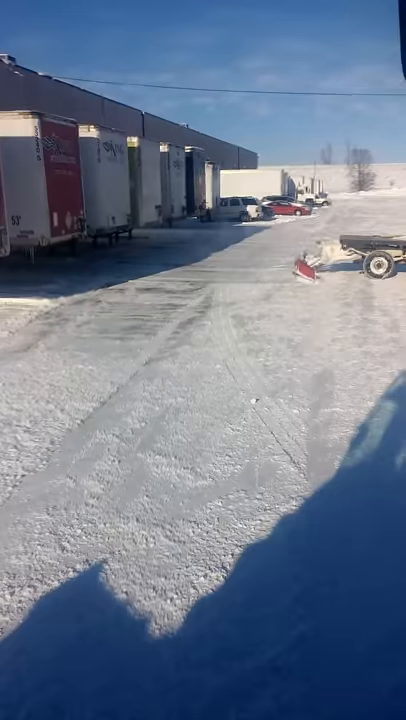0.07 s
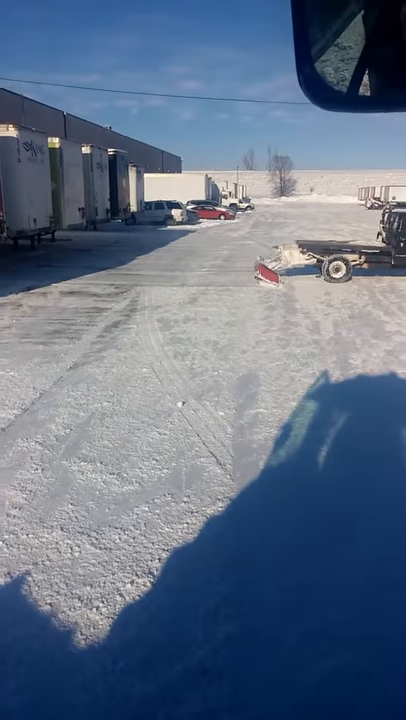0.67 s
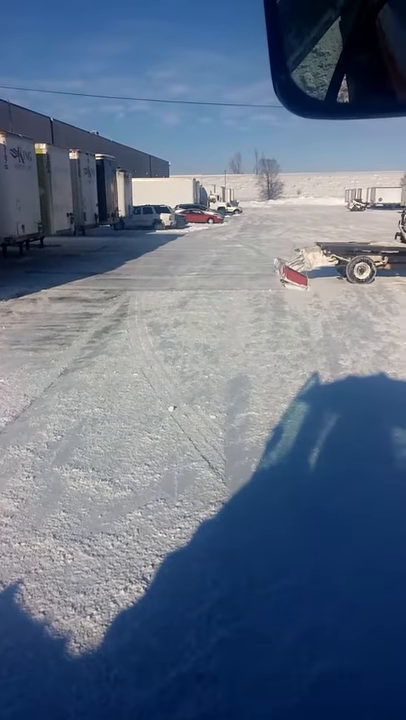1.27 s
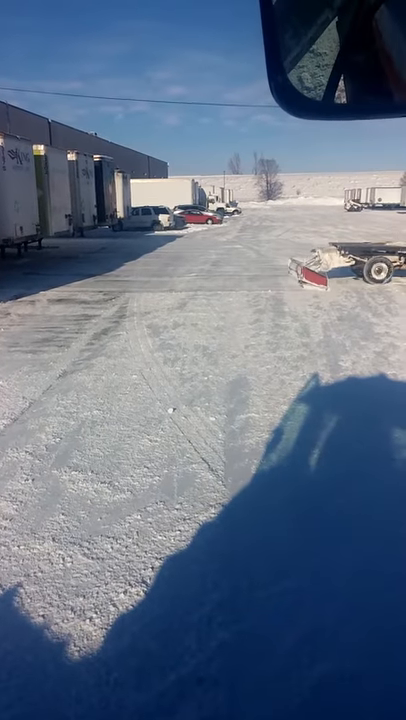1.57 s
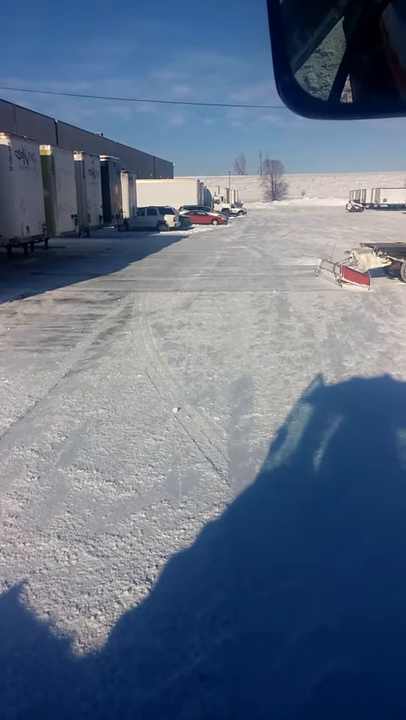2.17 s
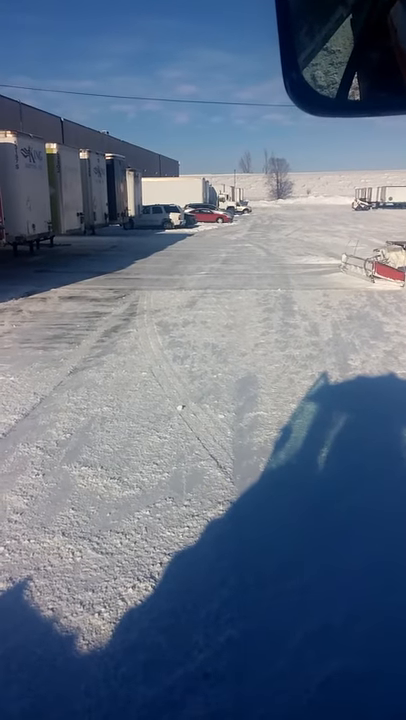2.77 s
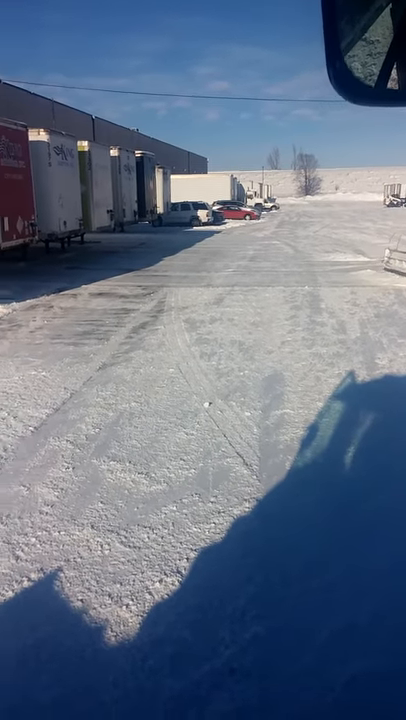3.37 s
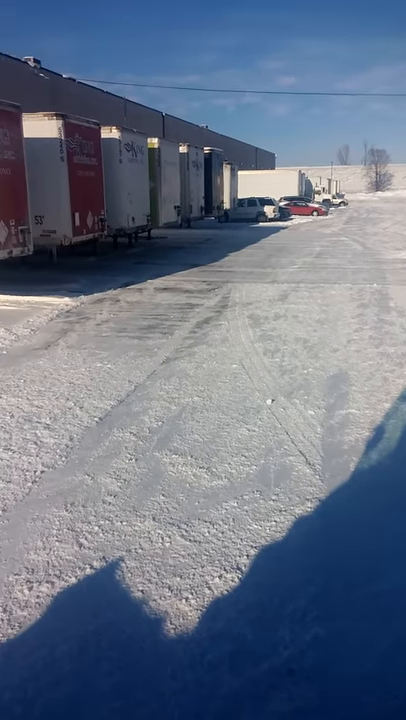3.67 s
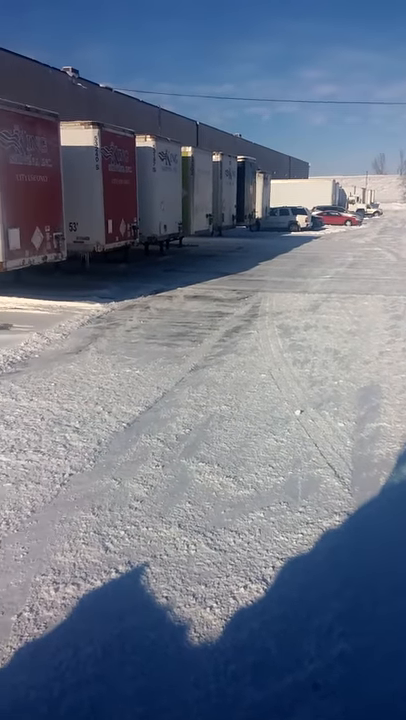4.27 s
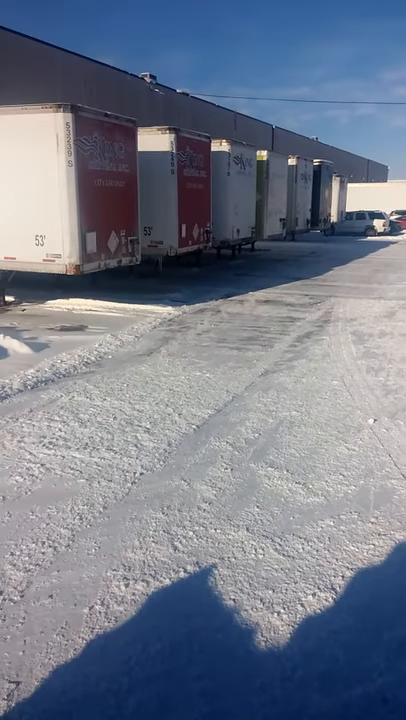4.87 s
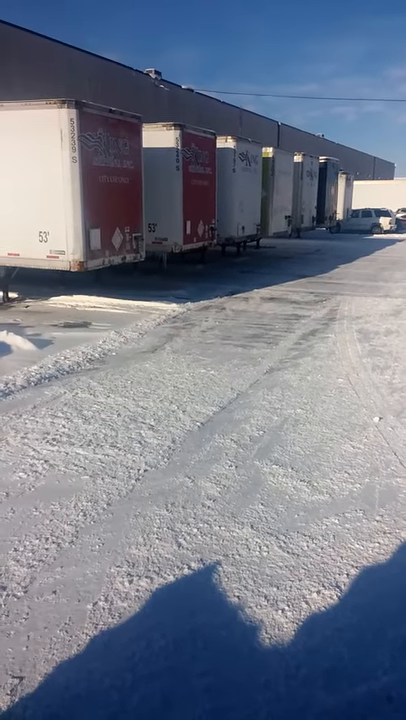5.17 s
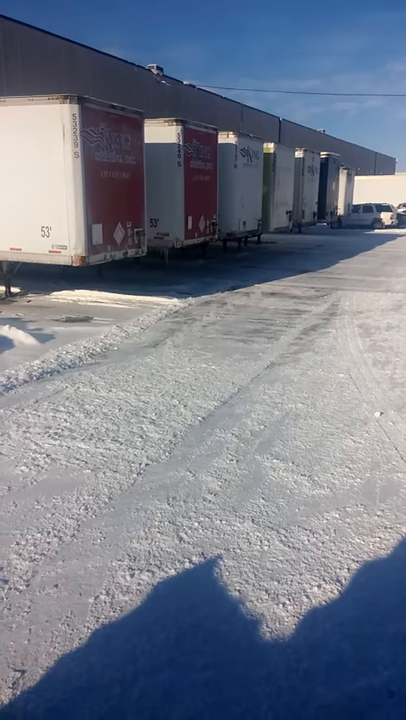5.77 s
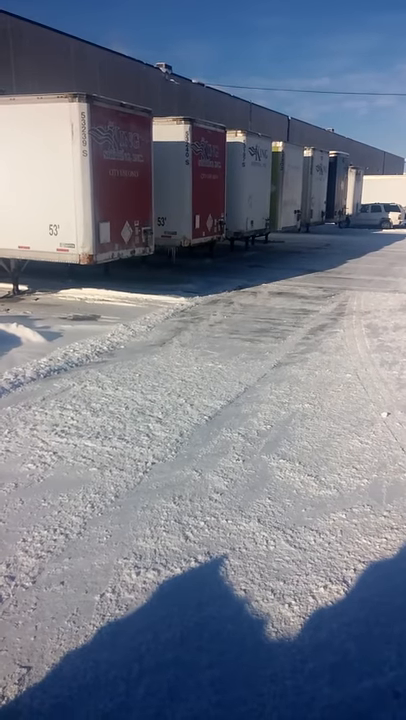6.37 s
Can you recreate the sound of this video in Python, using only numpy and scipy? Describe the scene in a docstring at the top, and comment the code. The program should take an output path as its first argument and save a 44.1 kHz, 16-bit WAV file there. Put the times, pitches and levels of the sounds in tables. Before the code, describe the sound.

Close diesel clatter heard from a truck cab soon drops to a duller idle, with a humming drone that ends in a pulsing shudder.

```python
"""Loud, close knocking of a four-cylinder diesel at idle, heard from a truck cab in a snowy yard; soon more muffled.
Each cylinder knocks the block with its own colour and rings the covers. A slowly beating drone,
a low rumble and dull jolts fill the cab and follow the engine's level, until the idle settles into
a pulsing shudder. Air hisses softly, and a small loose metal part pings now and then."""
import sys
import numpy as np
from scipy import signal
from scipy.fft import rfft, irfft, next_fast_len
from scipy.io import wavfile
from scipy.ndimage import uniform_filter1d

SR = 44100
rng = np.random.default_rng(int(sys.argv[2]) if len(sys.argv) > 2 else 0)


def pcm_store(signal):
    """Save signal as 16-bit PCM."""
    levels = np.round(np.clip(np.atleast_2d(signal), -1, 1) * 32767)
    wavfile.write(sys.argv[1], SR, levels.astype(np.int16).T)


N = 291501
TIME = np.arange(N) / SR
FFT_SIZE = 2 * next_fast_len(N // 2 + 1)
CYLINDER_COUNT = 4

# engine level in the cab (time [s], level [dB])
ENGINE_LEVEL = [(.6, -23.5), (1.68, -23.5), (1.88, -31), (2.6, -31.5), (3.63, -31), (3.82, -28),
                (4.6, -28.5), (4.9, -29), (5.7, -28.5), (6.6, -28.5)]
# sound path from the engine (time [s], openness [0-1])
PATH_OPEN = [(1.68, 0.67), (1.88, 0.13), (3.5, 0.09), (4.5, 0), (6.6, 0)]
# two microphone ports (frequency [Hz], likeness [0-1], left lead [rad], left minus right [dB])
MIC_PORTS = [(60, 0.93, -0.14, -0.1), (170, 1, 0.18, 0.06), (330, 0.79, -0.26, -1), (447, 0.91, 0.32, 4.5),
             (680, 0.57, -0.5, 0), (990, 0.75, -1.35, -0.5), (1510, 0.35, -2.0, -3),
             (2040, 0.51, -1.5, -6.5), (2490, 0, -1.5, -5), (3020, 0.38, -2, 3), (3440, 0.5, -1.5, 5),
             (4300, 0.03, -1.5, -6), (5200, 0, 2.5, -2), (9000, 0.03, 1, -1.8)]
# microphone turns left (start [s], end [s])
MIC_TURN_S = [3.7, 5.4]


def amp(db):
    """Decibels to gain."""
    return 10 ** (np.asarray(db) / 20)


def unit(x):
    """Scales to rms 1."""
    return x / np.sqrt(np.mean(x ** 2) + 1e-20)


def curve(rows):
    """Control curve at every sample."""
    return np.interp(TIME, *np.array(rows).T)


def colour(rows, hz, column=1):
    """One column of a spectrum, interpolated in log frequency."""
    rows = np.array(rows)
    return np.interp(np.log(hz + 1), np.log(rows[:, 0]), rows[:, column])


def bins_hz(size):
    """FFT bin frequencies."""
    return np.fft.rfftfreq(size, 1 / SR)


def add(mix, s, sound):
    """Mixes a sound in at time s."""
    part = mix[..., max(round(s * SR), 0):][..., :sound.shape[-1]]
    part += sound[..., :part.shape[-1]]


def noise(gain, size):
    """Shaped stereo noise, mostly less alike at the two ports as pitch rises."""
    left, other = rfft(rng.standard_normal((2, size)))
    same = np.clip(colour(MIC_PORTS, bins_hz(size)), 0, 1)
    right = same * left + np.sqrt(1 - same ** 2) * other
    return unit(irfft(np.array([left, right]) * gain, size))


def wash(rows):
    """Coloured noise for the whole scene."""
    return noise(amp(colour(rows, bins_hz(FFT_SIZE))), FFT_SIZE)[:, :N]


def wander(size, rate_hz):
    """Smooth random motion of rms 1."""
    lowpass = signal.butter(2, rate_hz, fs=SR, output="sos")
    return unit(signal.sosfilt(lowpass, rng.standard_normal(size)))


def swell(t, peak_s, sharp):
    """Envelope that rises to 1 at peak_s and dies away."""
    u = np.maximum(t, 0) / peak_s
    return (u * np.exp(1 - u)) ** sharp


def port_scatter_rad(hz):
    """Rms phase difference that gives the ports their likeness."""
    return np.sqrt(-2 * np.log(np.clip(colour(MIC_PORTS, hz), .01, 1)))


def follow_db(db_per_db, close_db=-24):
    """Level change of a layer that follows the engine's closeness."""
    return db_per_db * (curve(ENGINE_LEVEL) - close_db)


def crank(first_knock_s=.5935):
    """Running count of firings, two per crank turn."""
    # (time [s], speed [rpm])
    speed = [(.6, 798.3), (1.5, 798.2), (2.2, 797.5), (3, 796.7), (3.9, 796.6), (4.45, 793.8),
             (5.05, 795.3), (5.75, 796.7), (6.4, 795)]
    firings = 2 * np.cumsum(curve(speed)) / 60 / SR
    return firings - np.interp(first_knock_s, TIME, firings)


def firing_times(firings, first=0, step=1):
    """Times [s] of every step-th firing, counted from 0."""
    return np.interp(np.arange(first, firings[-1], step), firings, TIME)


def block_gain(cylinder, hz):
    """Response of block and covers to one cylinder, counted from 0."""
    # (frequency [Hz], width [Hz], level for cylinder 1, 2, 3, 4 [dB])
    modes = [(246.5, 57, -6, -8, -6.5, -6.5), (331.7, 41, -5.5, -10.5, -8, -4),
             (430.4, 97, -7, -6.5, -12, -11), (577, 110, -17, -10.5, -13, -10),
             (669, 81, -3, -3, -9.5, -12.5), (752, 97, -7.5, -24, -6.5, -12), (815, 49, -6, -11.5, -13, -7),
             (922, 124, -5.5, -8.5, -10.5, -14.5), (1015, 96, -19, -17, -11.5, -15),
             (1070, 54, -5, -16, -28, -32), (1139, 133, -12.5, -10, -18.5, -13.5),
             (1193, 120, -23, -8, -27, -27), (1240, 68, -22, -20, -14.5, -31),
             (1420, 143, -11, -8, -9.5, -27), (1428, 79, -11, -21, -12.5, -13.5),
             (1570, 290, -10, -18.5, -11.5, -26.5), (1582, 41, -19, -34, -14, -12.5),
             (1735, 42, -8.5, -12, -15, -15.5), (1820, 93, -15, -10, -22.5, -22),
             (1953, 130, -9, -21, -15.5, -15), (2091, 54, -10.5, -12.5, -12, -15),
             (2286, 51, -22, -15, -20, -36), (2347, 380, -17, -18.5, -24.5, -23.5),
             (2590, 380, -23.5, -23.5, -25.5, -27), (2910, 730, -25.5, -28, -27, -30)]
    modes = np.array(modes, float)
    peaks = 1 / (1 + (2 * (hz - modes[:, :1]) / modes[:, 1:2]) ** 2) ** 2
    return np.sqrt(amp(modes[:, 2 + cylinder]) ** 2 @ peaks)


def knock_signature(gain, peak_s, lead_s, spread=.4998, dispersion=.1986, attack_s=.002):
    """A cylinder's own knock: each pitch has its delay; slow bending waves bring the lows last."""
    hz = np.linspace(0, SR / 2, len(gain))
    draws = rng.standard_normal((2, len(hz)))
    path, port = (unit(uniform_filter1d(uniform_filter1d(v, 5), 5)) for v in draws)
    delay_s = lead_s + peak_s * np.exp(spread * np.clip(path, -2, 2)) * (2000 / (hz + 200)) ** dispersion
    phase = -2 * np.pi * np.cumsum(delay_s) * hz[1]
    apart = port_scatter_rad(hz) * port / 2
    knock = irfft(gain * np.exp(1j * np.array([phase + apart, phase - apart])))
    t = np.arange(knock.shape[-1]) / SR
    attack = np.clip((t - lead_s) / attack_s, 0, 1)
    release = np.minimum((t[-1] - t) / lead_s, 1)
    return unit(knock * attack * release)


def diesel_knocks(firings, uneven_db=.65, knock_db=-.75, rasp_db=-19.5, lead_s=.01, size=4096):
    """Every firing rings the block, partly alike each cycle, with a rasp of injector noise."""
    # in firing order (lag [s], swell [s], level [dB], rasp [dB], gain over the microphone turn [dB])
    cylinders = [(-.001, .0115, -2, 10, -0.3), (-.002, .012, -1, 7.5, 0.5), (-.001, .01, -2, 8.5, -0.3),
                 (-.003, .0105, 1.06, 8.5, 0.2)]
    # cycle to cycle (frequency [Hz], likeness [0-1])
    repeatability = [(250, 0.54), (450, 0.53), (800, 0.66), (1500, 0.89), (2100, 0.65), (2900, 0.83)]
    # (frequency [Hz], density [dB])
    rasp_colour = [(1500, -15), (2200, 14), (2700, -5), (3500, -2), (4300, 9), (4800, 4), (5300, -2),
                   (5900, -0.5), (7000, -10), (10000, -25.5), (15000, -64)]
    t, hz = np.arange(size) / SR, bins_hz(size)
    same = np.clip(colour(repeatability, hz), 0, 1)
    rasp_gain = amp(colour(rasp_colour, hz))
    knocks, rasps = np.zeros((2, 2, N))
    for k, (lag_s, peak_s, level_db, injector_db, turn_db) in enumerate(cylinders):
        gain = amp(level_db) * block_gain(k, hz)
        steady, loose = gain * same, gain * np.sqrt(1 - same ** 2)
        repeating = np.linalg.norm(steady) * knock_signature(steady, peak_s, lead_s)
        for s in firing_times(firings, k, CYLINDER_COUNT) + lag_s:
            force = amp(np.interp(s, MIC_TURN_S, [0, turn_db]) + uneven_db * rng.standard_normal())
            varying = np.linalg.norm(loose) * unit(swell(t, peak_s, sharp=.22) * noise(loose, size))
            rasp = amp(injector_db) * swell(t, peak_s, sharp=.59) * noise(rasp_gain, size)
            add(knocks, s - lead_s, force * repeating)
            add(knocks, s, force * varying)
            add(rasps, s, force * rasp)
    treble = amp(rasp_db + 8 * curve(PATH_OPEN))  # an open path passes more treble
    return amp(curve(ENGINE_LEVEL)) * (amp(knock_db) * unit(knocks) + treble * unit(rasps))


def cover_rings(firings, uneven_db=.5, detune=.005, wobble_s=1 / 16000, size=3000):
    """Each cylinder rings its own parts of the covers, briefly and roughly, much alike each cycle."""
    # (cylinder [1-4], pitch [Hz], lag [s], swell [s], level before, after the microphone turn [dB])
    rings = [(1, 435, .009, 0.0066, -12, -2.5), (1, 820, 0, 0.01, 3.5, 3.5),
             (1, 830, 0.019, 0.0056, -3.5, -2), (1, 1425, 0, 0.0054, 5, 0.5),
             (1, 1733, 0.00099, 0.0042, -5, 2), (1, 2600, 0, 0.0028, -9, -9), (1, 2200, 0, .0034, -16, 2),
             (2, 435, .006, 0.0071, -3.5, -3.5), (2, 680, 0, 0.0094, -8.5, -10),
             (2, 928, .006, 0.007, -13, -3.5), (2, 1217, .011, 0.006, -14, 3),
             (2, 1840, .008, .0052, -2, -5), (2, 2085, 0, 0.0047, -2, 1),
             (3, 620, 0.00093, 0.0052, -12, -13), (3, 1435, .004, 0.0056, 1, 2),
             (3, 1560, .012, 0.0033, 3, -13), (4, 668, .005, 0.0091, .5, -7), (4, 890, 0, 0.0056, -11, -2),
             (4, 1800, .004, 0.005, -6.5, -20), (4, 2078, .004, .004, -5.5, -4)]
    t, out = np.arange(size) / SR, np.zeros((2, N))
    for cylinder, hz, lag_s, peak_s, before_db, after_db in rings:
        for s in firing_times(firings, cylinder - 1, CYLINDER_COUNT) + lag_s:
            force, pitch, apart = rng.standard_normal(3)
            db = np.interp(s, MIC_TURN_S, [before_db, after_db]) + uneven_db * force
            cycles = hz * (1 + detune * pitch) * t + wobble_s * hz * wander(size, rate_hz=110)
            port_rad = port_scatter_rad(hz) * apart * np.array([[.5], [-.5]])
            add(out, s, amp(db) * swell(t, peak_s, sharp=1.4) * np.sin(2 * np.pi * cycles + port_rad))
    return amp(curve(ENGINE_LEVEL)) * out


def valve_ticks(firings, lag_s=.005, gap_s=.005, jitter_s=.001, step_db=-1.5, uneven_db=2, size=1024):
    """Injector and valves snap shut after each firing: three quick, uneven metallic ticks."""
    # (frequency [Hz], density [dB])
    tick_colour = [(1500, -10), (2500, 0), (3500, -6.5), (4300, -1.5), (4900, 2), (5400, -3), (6000, -6),
                   (7500, -21), (12000, -53)]
    t, out = np.arange(size) / SR, np.zeros((2, N))
    gain = amp(colour(tick_colour, bins_hz(size)))
    envelope = swell(t, peak_s=.0013, sharp=2)
    for s in firing_times(firings):
        for k, (force, late) in enumerate(rng.standard_normal((3, 2))):
            db = -16.5 + k * step_db + uneven_db * force
            add(out, s + lag_s + k * gap_s + late * jitter_s, amp(db) * envelope * noise(gain, size))
    return amp(curve(ENGINE_LEVEL) + 6 * curve(PATH_OPEN)) * out


def bay_roar(gain_db=-13, open_db=14):
    """Engine bay echoes fill the gaps between knocks, most while the path is open."""
    # (frequency [Hz], density [dB])
    roar_colour = [(100, -42), (220, 6.5), (400, 7.5), (550, -2), (800, -1), (1200, 5), (2100, -2),
                   (3200, -11), (4400, -17), (5800, -20.5), (8000, -43), (12000, -77)]
    return amp(curve(ENGINE_LEVEL) + gain_db + open_db * curve(PATH_OPEN)) * wash(roar_colour)


def exhaust_rumble(firings, base_db=-25, noise_db=-3, shudder_db=2.5):
    """Low exhaust orders inside a noisy boom that throbs with each firing."""
    # (multiple of the firing rate [1], relative level [dB])
    orders = [(2, -18.5), (3, -16), (4, -14), (5, -4.5), (8, -31)]
    # (frequency [Hz], density [dB])
    boom_colour = [(15, -51), (33, -37), (50, 3.5), (63, -9), (80, 4.5), (130, 7), (185, 5.5), (230, -3),
                   (300, -12.5), (500, -65)]
    tones = sum(amp(db) * np.sqrt(2) * np.cos(2 * np.pi * (k * firings + rng.random()))
                for k, db in orders)
    boom = wash(boom_colour) * (1 + np.cos(2 * np.pi * firings))
    return amp(base_db + follow_db(1.325) + shudder_db * shudder()) * (tones + amp(noise_db) * boom)


def drone_phase(waver_rad=.17):
    """Phase of the drone, drifting a little around its pitch."""
    # (time [s], frequency [Hz])
    pitch = [(.6, 168.9), (1.9, 169.1), (3.6, 168), (4.6, 167.7), (6.6, 167.8)]
    return 2 * np.pi * np.cumsum(curve(pitch)) / SR + waver_rad * wander(N, rate_hz=7.5)


def cab_drone(phase, base_db=-19, octave_db=-19, neighbour_db=-48, beat_hz=2.234, crest_s=3.81):
    """A fluttering tone with a fitful octave booms in the cab, beating with a weaker one just below."""
    octave = amp(octave_db + 3 * wander(N, rate_hz=7)) * np.cos(2 * phase)
    flutter_db = .98 * wander(N, rate_hz=16)
    tone = amp(base_db + follow_db(1.69) + flutter_db) * (np.cos(phase) + octave)
    neighbour = amp(neighbour_db) * np.cos(phase - 2 * np.pi * beat_hz * (TIME - crest_s))
    return np.sqrt(2) * (tone + neighbour)


def air_hiss(firings, gain_db=4, depth=.22, lag_s=.01):
    """Moving air hisses and puffs a little with each firing."""
    # (time [s], level [dB])
    level = [(.6, -58.5), (1.8, -57), (4.65, -56), (5, -61.5), (5.7, -62), (6.1, -60), (6.6, -59.5)]
    # (frequency [Hz], density [dB])
    hiss_colour = [(500, -51), (3300, -26), (6000, 7), (8000, 8), (10000, 2), (12500, -6), (15500, -15.5)]
    puffs = 1 + depth * np.cos(2 * np.pi * np.interp(TIME - lag_s, TIME, firings))
    return amp(curve(level) + gain_db) * puffs * wash(hiss_colour)


def cab_jolts(firings, drone_rad, lag_s=.01423, base_db=-27.5, spread_db=6.5, ring_hz=125, detune=.062):
    """The cab booms briefly at an uneven jolt each crank turn; heavy thumps push in step with the drone."""
    # crowding together in the shudder (time [s], peak [dB], frequency [Hz])
    thumps = [(0.72, -16.5, 125), (0.768, -12.5, 135), (0.874, -18, 125), (1.056, -10, 135),
              (1.586, -15, 120), (2.009, -22.5, 135), (2.374, -21, 123), (2.998, -19, 132),
              (3.542, -21.5, 115), (3.879, -18, 139), (4.606, -25.5, 115), (4.641, -20, 125),
              (5.172, -21, 121), (5.513, -18.5, 141), (5.687, -21.5, 130), (5.799, -22, 120),
              (5.863, -16, 105), (5.955, -23, 116), (6.024, -23, 106), (6.096, -20.5, 131),
              (6.143, -23, 130), (6.195, -19, 149), (6.252, -16, 142), (6.373, -20, 137),
              (6.416, -19.5, 136), (6.473, -32, 124), (6.533, -20, 130), (6.597, -16.5, 143)]
    t, out = np.arange(3000) / SR, np.zeros(N)
    turns_s = firing_times(firings, first=1, step=2)
    force, pitch = rng.standard_normal((len(turns_s), 2)).T
    jolt_db = base_db + np.interp(turns_s, TIME, follow_db(2.5)) + spread_db * force
    jolt_hz = ring_hz * (1 + detune * pitch)
    heavy = [(s, db, hz, np.interp(s, TIME, drone_rad)) for s, db, hz in thumps]
    regular = [(s, db, hz, 0) for s, db, hz in zip(turns_s + lag_s, jolt_db, jolt_hz)]
    peak_s = .0083
    envelope = swell(t, peak_s, sharp=1.8)
    for s, db, hz, phase in heavy + regular:
        add(out, s - peak_s, amp(db) * envelope * np.cos(2 * np.pi * hz * (t - peak_s) + phase))
    return out


def loose_part(firings, lag_s=.006, base_db=-39, spread_db=3, rise_s=.003, wobble_rad=.55, size=5000):
    """The second cylinder faintly rattles a small metal part; now and then it pings louder."""
    # (time [s], level [dB])
    pings = [(.786, -30), (1.541, -31), (2.59, -40), (2.741, -40), (3.191, -35.5), (4.548, -38),
             (5.301, -28.5), (5.759, -40), (6.02, -37), (6.357, -36)]
    # (frequency [Hz], level [dB], t60 [s])
    modes = [(4700, -1.5, 0.052), (4730, -8.5, 0.075), (4860, 0, .07), (5040, -10.5, 0.075), (4630, 0, .04)]
    t, out = np.arange(size) / SR, np.zeros((2, N))
    usual_db = base_db + follow_db(3.3)
    rattle = [(s + lag_s, np.interp(s, TIME, usual_db) + spread_db * rng.standard_normal())
              for s in firing_times(firings, first=1, step=CYLINDER_COUNT)]
    for s, db in [*pings, *rattle]:
        ring = np.zeros((2, size))
        for hz, mode_db, t60_s in modes:
            phase = 2 * np.pi * (hz * t + rng.random((2, 1))) + wobble_rad * wander(size, rate_hz=250)
            ring += amp(mode_db - 60 * t / t60_s) * np.sin(phase)
        add(out, s, amp(db) * ring * (1 - np.exp(-t / rise_s)))
    return out


def hard_knocks(peak_s=.0063, size=4096):
    """Now and then a charge burns harshly and rings the block harder and brighter."""
    # (time [s], level re engine [dB])
    harsh_firings = [(.894, -3.5), (1.646, -0.5), (2.096, -2), (2.248, -0.5), (2.85, 2), (3.452, -1.5),
                     (3.753, 2.5), (3.904, -6.5), (4.206, -1), (4.508, 2.5), (4.549, 1.5), (4.659, 1),
                     (5.413, 0), (6.318, -4)]
    # (frequency [Hz], gain re usual knock [dB])
    brightness = [(250, -11), (850, 2.5), (1500, 1), (2200, 3.5), (2900, 9.5), (3600, 3.5), (8000, 0),
                  (14000, -14)]
    t, hz, out = np.arange(size) / SR, bins_hz(size), np.zeros((2, N))
    gain = block_gain(0, hz) * amp(colour(brightness, hz))
    for s, db in harsh_firings:
        add(out, s, amp(db) * swell(t, peak_s, sharp=.77) * noise(gain, size))
    return amp(curve(ENGINE_LEVEL)) * out


def hum_throb(pulse_hz=17.7, crest_s=6.535, depth=.38):
    """Gain of the cab's hum: wavers slowly, then pulses quickly as the shudder builds."""
    # (time [s], gain [dB])
    waver = [(1.8, 0), (2.15, -1.5), (2.4, 0.5), (3.9, -0.5), (4.02, -1.5), (4.2, -2.5), (4.33, 0),
             (4.48, -2), (4.6, 1), (4.95, -1.5), (5.15, 2.5), (5.6, -2.5), (6.1, -0.5)]
    pulse = np.cos(2 * np.pi * pulse_hz * (TIME - crest_s))
    return amp(curve(waver)) * (1 + depth * shudder() * pulse)


def shudder(start_s=5.61, build_s=.5):
    """How far the idle has settled into its shudder, 0-1."""
    return np.clip((TIME - start_s) / build_s, 0, 1)


def shudder_boom(waver_rad=.47):
    """The shudder sets the cab booming on low, unsteady tones."""
    # (frequency [Hz], level [dB])
    cab_tones = [(80, -45), (101.5, -31.5)]
    tones = sum(amp(db) * np.cos(2 * np.pi * hz * TIME + waver_rad * wander(N, rate_hz=8))
                for hz, db in cab_tones)
    return np.sqrt(2) * shudder() * tones


def scene():
    """Clatter, roar, cab hum, jolts and hiss around one crank."""
    firings = crank()
    drone_rad = drone_phase()
    clatter = diesel_knocks(firings) + hard_knocks() + cover_rings(firings)
    clatter += valve_ticks(firings) + loose_part(firings)
    hum = hum_throb() * (exhaust_rumble(firings) + cab_drone(drone_rad) + shudder_boom())
    return clatter + bay_roar() + hum + cab_jolts(firings, drone_rad) + air_hiss(firings)


def record(dry, start_s=.627, cutoff_hz=15800):
    """Level and phase differ by pitch at the two ports; abrupt start, then a band limit."""
    hz, side = bins_hz(FFT_SIZE), np.array([[.5], [-.5]])
    port_gain = amp(side * colour(MIC_PORTS, hz, column=3))
    port_phase = np.exp(1j * side * colour(MIC_PORTS, hz, column=2))
    heard = irfft(rfft(dry, FFT_SIZE) * port_gain * port_phase, FFT_SIZE)[:, :N]
    lowpass = signal.firwin(511, cutoff_hz, window=("kaiser", 9), fs=SR)
    return signal.oaconvolve(heard * (TIME >= start_s), lowpass[None], "same")


dry = scene()
out = record(dry)
pcm_store(out)
```